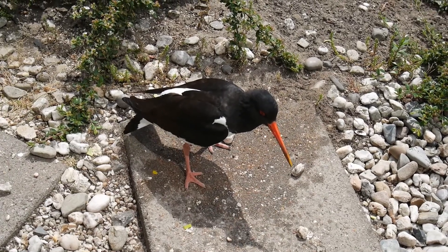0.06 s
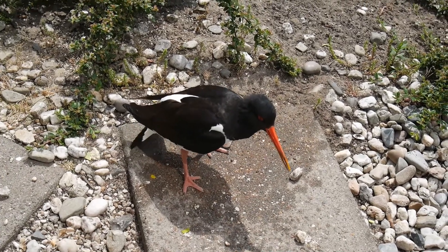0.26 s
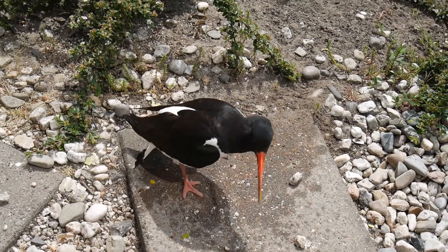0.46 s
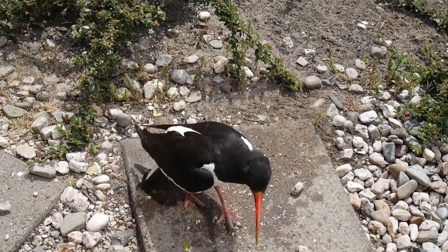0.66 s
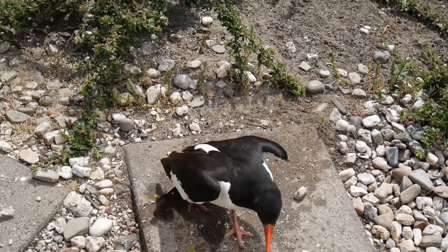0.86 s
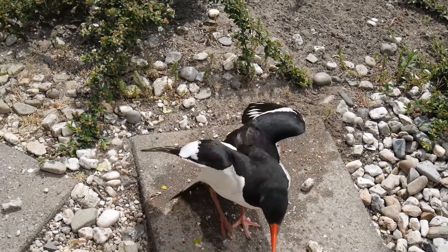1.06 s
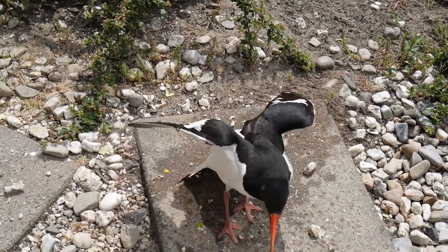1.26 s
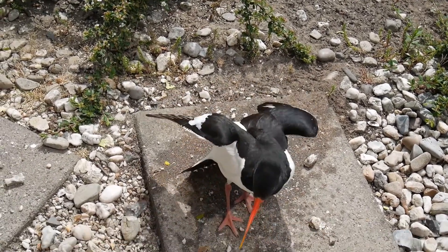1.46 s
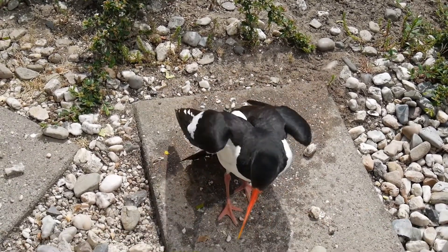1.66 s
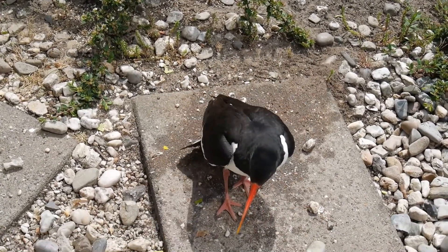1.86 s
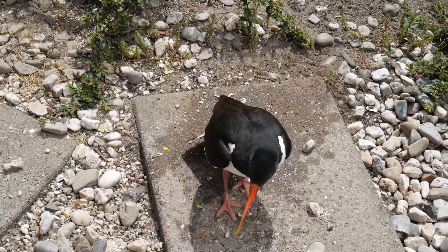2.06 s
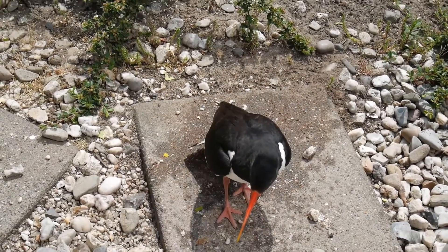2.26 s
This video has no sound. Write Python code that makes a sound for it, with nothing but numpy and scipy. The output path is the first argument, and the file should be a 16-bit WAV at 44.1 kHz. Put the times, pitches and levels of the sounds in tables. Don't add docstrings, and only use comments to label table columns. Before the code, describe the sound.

Shore bird piping close up: the echo of an earlier call fades, then sharp, high, rising-then-falling whistles at 0.2, 0.6, 0.88, 1.3, 1.5 and 1.93 s, each under a tenth of a second. A mate overlaps the first two. Slab and walls ring briefly. Soft traffic hum throughout, dipping after loud calls; faint hollow clanks 1.2-1.5, tiny lens ticks from 1.6, barely audible far call at 2.1.

```python
import sys
import numpy as np
from scipy import signal
from scipy.fft import rfft, irfft
from scipy.io import wavfile
from scipy.ndimage import uniform_filter1d, minimum_filter1d

SR = 44100
rng = np.random.default_rng(int(sys.argv[2]) if len(sys.argv) > 2 else 0)


def unload_wav(signal):
    wavfile.write(
        sys.argv[1],
        SR,
        np.round(np.clip(np.atleast_2d(signal).T, -1, 1) * 32767).astype(np.int16),
    )


def volts_from_decibels(level):
    exponent = np.asarray(level, float) / 20
    return 10 ** exponent


N = 101430
LEAD = 13230


def read(points, hz):
    f, value = np.transpose(points)
    return np.interp(np.log(hz + 1), np.log(f + 1), value)


def evened(x):
    return x / np.sqrt(np.mean(x ** 2) + 1e-20)


def drift(count, seconds):
    size = max(round(seconds * SR), 2)
    once = uniform_filter1d(rng.standard_normal(count), size)
    return evened(uniform_filter1d(once, size))


UPPER_PARTIALS_DB = [-13.5, -25.5, -22.5]


def pipe(rows, bill_db):
    waver, waver_s = .004, .002
    flutter_db, flutter_s = 2.1, .0075
    breathy_db, hiss_db = -28, -38
    brighten_db_per_db, usual_db = .45, -18.5
    rasp_db, rasp_s = 3.5, .00057
    fast_fall_hz_per_s, fall_loss_db = 60000, -3
    fall_break_db, fall_break_s = 3, .0015

    s, hz, db, second_db = np.transpose(rows)
    knots = np.sort(s)
    count = 4410
    t = np.arange(count) / SR + s[0]
    bill_db = np.interp(t, knots[[len(s) // 3, len(s) // 2, -2, -1]], bill_db)

    def soft(values):
        return uniform_filter1d(np.interp(t, knots, values), size=30)

    pitch_hz, loud_db, second_db = soft(hz), soft(db), soft(second_db)
    wavering_hz = uniform_filter1d(pitch_hz, size=40) * (1 + waver * drift(count, waver_s))
    turns = np.cumsum(wavering_hz) / SR
    effort_db = brighten_db_per_db * (loud_db - usual_db)
    levels_db = [0 * t, second_db]
    for upper_db in UPPER_PARTIALS_DB:
        rasp = rasp_db * drift(count, rasp_s)
        levels_db.append(upper_db + bill_db + .5 * second_db + effort_db + rasp)

    breath = volts_from_decibels(breathy_db) * uniform_filter1d(rng.standard_normal(count), size=12) * 1.9
    fall_hz_per_s = -np.gradient(uniform_filter1d(pitch_hz, size=120)) * SR
    falling = np.clip(fall_hz_per_s / fast_fall_hz_per_s, 0, 1)
    tone = np.zeros(count)
    for partial, level_db in enumerate(levels_db, 1):
        unsteady = partial ** .5
        flutter = flutter_db * unsteady * drift(count, flutter_s)
        breaking = falling * unsteady * (fall_loss_db + fall_break_db * drift(count, fall_break_s))
        wave = np.sin(2 * np.pi * (partial * turns + rng.random()))
        tone += volts_from_decibels(level_db + flutter + breaking) * wave

    rush = np.diff(rng.standard_normal(count + 3), n=3) / 3.1
    hiss = volts_from_decibels(hiss_db + bill_db) * rush
    ends = np.clip((s[-1] - t) / .00067, 0, 1) * np.clip((t - s[0]) / .00035, 0, 1)
    sound = np.sqrt(2) * volts_from_decibels(loud_db) * ends * (tone * (1 + breath) + hiss)
    return LEAD + round(s[0] * SR), sound


# time in seconds, pitch in Hz, level in dB, second partial in dB over the first.
EARLIER_CALL = [(-.2, 2600, -34.5, 0.5), (-.188, 3150, -26.5, -17), (-.16, 3418, -33, -13),
                (-.145, 2600, -79, -9)]
FIRST_CALL = [(0.2039, 1490, -35, -10), (0.2081, 1800, -23.5, -7.5), (0.2089, 2507, -15, -5.5),
              (0.2151, 2670, -11, -8.5), (0.2223, 3357, -21, -12), (0.227, 3423, -17.5, -4.5),
              (0.238, 3495, -18, -5.5), (0.247, 2700, -19, -8), (0.258, 2290, -30, 1)]
MATE_FIRST_CALL = [(.227, 2496, -38, -18.5), (0.229, 2733, -32.5, 1.5), (0.236, 2773, -22.5, -3.5),
                   (0.239, 3331, -20.5, -21.5), (0.251, 3289, -22, -1.5), (.26, 3060, -15.5, -23.5),
                   (0.269, 2370, -32.5, -2)]
SECOND_CALL = [(0.59, 1700, -35.5, 3.5), (0.593, 2198, -49, -4.5), (0.5955, 2571, -14, 1.5),
               (0.602, 2707, -12.5, -10), (0.603, 3300, -23.5, 2.5), (0.616, 3473, -26.5, 4),
               (.626, 3400, -24.5, 0), (0.637, 3217, -25, 0), (0.65, 2190, -33, -2.5)]
MATE_SECOND_CALL = [(0.605, 2410, -41.5, -6), (0.605, 2595, -25, 0), (0.613, 2840, -32.5, -10.5),
                    (0.614, 3235, -32, -8), (0.638, 3270, -21, -14.5), (0.646, 2800, -37.5, 0),
                    (0.656, 2445, -45.5, -12)]
THIRD_CALL = [(0.8747, 1715, -53.5, -21.5), (0.876, 2570, -21, 0), (0.8916, 2670, -18, -6.5),
              (0.894, 3274, -18.5, -16), (0.905, 3326, -23.5, -3.5), (0.914, 3302, -20, -9),
              (0.922, 3104, -24.5, -4), (0.928, 2405, -30, -2.5), (0.936, 2027, -33, -9.5)]
FOURTH_CALL = [(1.2961, 1952, -42.5, -16), (1.3008, 2300, -21.5, -7), (1.3011, 2295, -16, -3),
               (1.3063, 2530, -12, -11.5), (1.3077, 3050, -23.5, -5), (1.317, 3242, -19.5, -1),
               (1.326, 3448, -19, -9.5), (1.338, 3108, -21, -3), (1.343, 2960, -79.5, -13.5)]
FIFTH_CALL = [(1.509, 1840, -43, -33), (1.5114, 2310, -27.5, -17.5), (1.512, 2601, -20.5, -3),
              (1.5191, 2755, -20, -3), (1.522, 3300, -16.5, -17.5), (1.534, 3301, -16, -21.5),
              (1.538, 3272, -20.5, -5), (1.546, 3030, -16.5, -10), (1.553, 2234, -35, -0.5)]
SIXTH_CALL = [(1.928, 1834, -43.5, -16.5), (1.932, 2176, -43.5, -8.5), (1.934, 2470, -22.5, -2.5),
              (1.94, 2994, -20.5, -1.5), (1.942, 3035, -16, -10), (1.95, 3164, -20.5, -6),
              (1.959, 3156, -15, -12), (1.971, 2916, -20.5, -12.5), (1.975, 2420, -42, -8)]
FAR_CALL = [(2.109, 2970, -92, 0.024), (2.117, 3550, -83.5, 0.0022), (2.129, 3810, -80, 0.02),
            (2.15, 3705, -81.5, 0.018), (2.16, 3470, -89, 0.037)]
# level in dB at the rise, the top, the fall and the end.
BILL_TURNS_DB = [
    (5, 6, 4, 4),
    (-7.5, -7.5, -0.5, -12.5),
    (7, 10, 7, 2.5),
    (-9.5, -1.5, 7, -24.5),
    (0.5, 1.5, 10.5, 10.5),
    (0, 2, 10, -16.5),
    (-6.5, -8, 4, -14.5),
    (3.5, 3.5, -1, 17),
    (4, -3.5, 2, -2),
    (-5, 1, 2, 8),
]


def birds():
    calls = (EARLIER_CALL, FIRST_CALL, MATE_FIRST_CALL, SECOND_CALL, MATE_SECOND_CALL,
             THIRD_CALL, FOURTH_CALL, FIFTH_CALL, SIXTH_CALL, FAR_CALL)
    out = np.zeros(N + LEAD + 4410)
    for rows, bill_db in zip(calls, BILL_TURNS_DB):
        at, sound = pipe(rows, bill_db)
        out[at:at + len(sound)] += sound
    return out


def tail(t60_s, start_s):
    t = np.arange(SR) / SR
    taps = rng.standard_normal((2, SR)) * (rng.random((2, SR)) < .1)
    taps = taps * volts_from_decibels(-60 * t / t60_s) * np.clip((t - start_s) / .012, 0, 1)
    return taps / np.linalg.norm(taps, axis=1, keepdims=True)


# delay in seconds, left level in dB, right level in dB.
NEAR_REFLECTIONS = [
    (.0033, -35.5, -14.5),
    (.0048, -18, -19.5),
    (.0085, -11.5, -27),
    (0.013, -32, -14.5),
]
# delay in seconds, spread in seconds, level in dB.
HOUSE_FRONTS = [
    (0.188, 0.0052, -27.5),
    (0.238, 0.024, -36),
]
# frequency in Hz, level in dB.
REVERB_COLOUR = [(2000, -11.5), (2500, -5.5), (3300, 1.5), (4700, -9.5), (5400, -5.5), (6700, 0.5),
                 (10000, 0), (13000, -2)]
# frequency in Hz, left over right in dB, colour in dB.
MIC_PORTS = [(1400, 2.5, -5.5), (2300, -0.5, -0.5), (3300, 3, 0), (5370, 3, 0), (7500, 8, 7),
             (8290, -3, -4), (10930, -10.5, 1), (11160, -20.5, -0.5), (13800, -19.5, -25)]


def garden(x):
    corner_db, corner_t60_s = -11, .15
    yard_db, yard_t60_s = -24, .74
    yard_dull_hz, treble_dies_db_per_s = 6000, 110
    late_s = np.arange(SR) / SR

    room = volts_from_decibels(corner_db) * tail(corner_t60_s, .0034)
    yard = tail(yard_t60_s, .05)
    dull = np.exp(-2 * np.pi * yard_dull_hz / SR)
    low = signal.lfilter([1 - dull], [1, -dull], yard)
    low = signal.lfilter([1 - dull], [1, -dull], low)
    room += volts_from_decibels(yard_db) * (low + (yard - low) * volts_from_decibels(-treble_dies_db_per_s * late_s))
    for delay_s, spread_s, db in HOUSE_FRONTS:
        room += yard * volts_from_decibels(db) * np.exp(-.5 * ((late_s - delay_s) / spread_s) ** 2)
    room = irfft(rfft(room) * volts_from_decibels(read(REVERB_COLOUR, np.arange(SR // 2 + 1))), SR)

    room[:, 0] += 1
    for delay_s, left_db, right_db in NEAR_REFLECTIONS:
        room[:, round(delay_s * SR)] += volts_from_decibels(np.array([left_db, right_db]))
    wet = signal.fftconvolve(x[None], room, axes=1)[:, LEAD:LEAD + N]

    f, tilt_db, colour_db = np.transpose(MIC_PORTS)
    hz = np.fft.rfftfreq(N, 1 / SR)
    half_tilt_db = np.interp(hz, f, tilt_db) / 2
    colour_db = np.interp(hz, f, colour_db)
    return irfft(rfft(wet) * volts_from_decibels(colour_db + np.array([half_tilt_db, -half_tilt_db])), N)


# frequency in Hz, width in Hz, level in dB.
BODY_MODES = [
    (2100, 450, 0),
    (2900, 600, -6),
]


def lens_motor():
    first_s, last_s, step_s = 1.6385, 2.3, .02
    tick_db, spread_db, attack_s = -42, 2.5, .0006
    at = (np.arange(first_s, last_s, step_s) * SR).astype(int)
    clicks = np.zeros(N)
    clicks[at] = volts_from_decibels(tick_db + spread_db * rng.standard_normal(len(at)))
    t = np.arange(600) / SR
    ring = np.zeros(len(t))
    for hz, width_hz, db in BODY_MODES:
        ring += volts_from_decibels(db) * np.exp(-np.pi * width_hz * t) * np.sin(2 * np.pi * hz * t)
    return signal.oaconvolve(clicks, ring * (1 - np.exp(-t / attack_s)))[:N]


# middle in seconds, half length in seconds, frequency in Hz, level in dB.
STREET_CLANKS = [
    (1.19, .035, 652, -62),
    (1.3, .02, 630, -64.5),
    (1.492, .03, 500, -64),
    (1.493, .025, 710, -62),
    (1.526, .015, 695, -58.5),
    (1.529, .015, 940, -60),
    (1.265, .02, 950, -66.5),
]


def hoots():
    t = np.arange(N) / SR
    out = np.zeros(N)
    for middle_s, half_s, hz, db in STREET_CLANKS:
        level = volts_from_decibels(db + 3.6 * drift(N, .008)) * np.exp(-((t - middle_s) / half_s) ** 2)
        wavering_hz = hz * (1 + .017 * drift(N, .0033))
        out += level * np.sin(2 * np.pi * np.cumsum(wavering_hz) / SR)
    return out


# frequency in Hz, density in dB per Hz.
HUM_SPECTRUM = [(30, -10.5), (85, -2.5), (200, -6), (450, -16), (700, -12), (1300, -17), (2500, -19),
                (4000, -30.5)]
# frequency in Hz, correlation from 0 to 1.
HUM_LIKENESS = [(30, .6), (80, .92), (300, .7), (1500, .72)]
# time in seconds, level in dB.
ENGINE_RUMBLE = [(0, 6.5), (.55, 3.5), (0.697, -7), (1.299, 2), (1.699, -0.5), (2.3, 5.5)]
# time in seconds, level in dB.
TYRE_ROAR = [(0, 0.5), (.2, 3.5), (.5, 1.5), (.75, 0.5), (1.2, 0.5), (1.35, -3.5), (1.55, 5), (1.8, -0.5),
             (2.3, -0.5)]


def hum():
    hum_db, left_db, hiss_db_per_khz = -59.5, .5, -2
    patchy_db, swell_db = 1, 1.4
    engine_top_hz, low_cut_hz = 149, 79.5
    tyre_hz, tyre_width = 500, 1
    frames = N // 256 + 9
    frame_s = np.arange(frames) * 256 / SR
    hz = np.fft.rfftfreq(2048, 1 / SR)
    column_hz = hz[:, None]

    a, b, c, d, patches = rng.standard_normal((frames, 1025, 5)).T
    patches = uniform_filter1d(patches, size=16, axis=0)
    patches = evened(uniform_filter1d(patches, size=12, axis=1))
    swell = evened(uniform_filter1d(rng.standard_normal(frames), size=16))
    same = np.clip(read(HUM_LIKENESS, hz), -1, 1)[:, None]
    left = a + 1j * b
    right = same * left + np.sqrt(1 - same ** 2) * (c + 1j * d)
    z = np.array([left, right])

    spectrum_db = read(HUM_SPECTRUM, hz) + hiss_db_per_khz * np.maximum(hz / 1000 - 4, 0)
    z *= volts_from_decibels(spectrum_db[:, None] + patchy_db * patches + swell_db * swell)
    engine_db = np.interp(frame_s, *np.transpose(ENGINE_RUMBLE))
    z *= volts_from_decibels(engine_db / (1 + (column_hz / engine_top_hz) ** 2))
    tyre_db = np.interp(frame_s, *np.transpose(TYRE_ROAR))
    z *= volts_from_decibels(tyre_db / (1 + (np.log(column_hz / tyre_hz + 1e-9) / tyre_width) ** 4))
    z *= 1 / np.sqrt(1 + (low_cut_hz / (column_hz + 1)) ** 6)
    noise = signal.istft(z, nperseg=2048, noverlap=1792)[1][:, :N]
    return volts_from_decibels(hum_db + left_db * np.array([[1], [-1]])) * evened(noise)


def scene():
    return garden(birds()) + hum() + hoots() + lens_motor()


# frequency in Hz, level in dB against the sound of its frame.
GRAIN = [(1000, -32), (3000, -33), (4300, -34), (6000, -27), (8500, -18), (10500, -13), (13500, -10)]
# frequency in Hz, level in dB against its loud neighbour below which a band is dropped.
MASKING = [(1000, -46), (2000, -50), (3300, -40), (4000, -29), (5500, -32), (8200, -23), (10000, -26),
           (11500, -19), (13000, -22)]


def smeared(x):
    onset_frames = 2
    hz, _, z = signal.stft(x, SR, nperseg=1536, noverlap=1152)
    near = uniform_filter1d(abs(z) ** 2, size=55, axis=1)
    near = np.sqrt(abs(uniform_filter1d(near, size=3, axis=2, origin=-1)))
    a, b = rng.standard_normal(z.shape + (2,)).transpose(3, 0, 1, 2)
    z = z + near * volts_from_decibels(read(GRAIN, hz))[:, None] * (a + 1j * b)

    mid_side = np.array([z[0] + z[1], z[0] - z[1]]) / 2
    band = uniform_filter1d(abs(mid_side) ** 2, size=9, axis=1)
    band = abs(uniform_filter1d(band, size=3, axis=2)) + 1e-18
    masker = -minimum_filter1d(-band[0], size=81, axis=0)
    audible = band > masker * volts_from_decibels(2 * read(MASKING, hz))[:, None]
    frame_power = band[0].sum(0)
    rising = frame_power > np.roll(frame_power, onset_frames)
    mid, side = mid_side * (audible | rising)
    return signal.istft(np.array([mid + side, mid - side]), SR, nperseg=1536, noverlap=1152)[1][:, :N]


def roll_off(x):
    return signal.sosfilt(signal.butter(12, 13880, fs=SR, output="sos"), x)


def record(dry):
    limit_db, squeeze, recover_db_per_s = -24, .79, 29.5
    edge_hz = 13900
    power = uniform_filter1d((dry ** 2).mean(0), size=600, origin=299)
    power_db = 10 * np.log10(abs(power) + 1e-12)
    recovery_db = np.arange(N) * recover_db_per_s / SR
    wanted_db = squeeze * np.maximum(power_db - limit_db, 0)
    held_db = np.maximum.accumulate(wanted_db + recovery_db) - recovery_db
    dip_db = uniform_filter1d(np.maximum(held_db, 0), size=1600, origin=799)
    ducked = dry / volts_from_decibels(dip_db)
    low_pass = signal.firwin(255, edge_hz, window=("kaiser", 9), fs=SR)
    mix = signal.oaconvolve(smeared(ducked), low_pass[None], "same")
    return roll_off(mix)


dry = scene()
out = record(dry)
unload_wav(out)
```